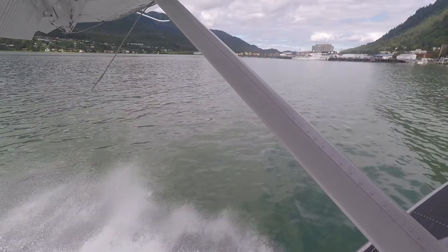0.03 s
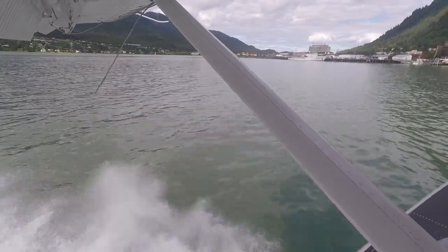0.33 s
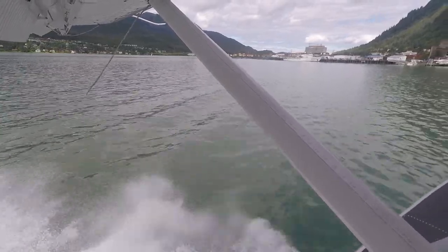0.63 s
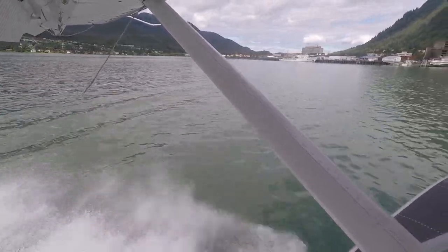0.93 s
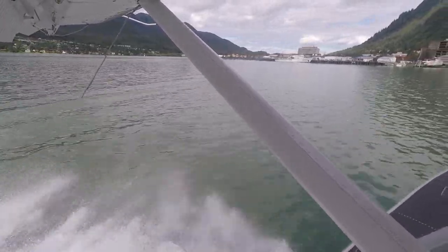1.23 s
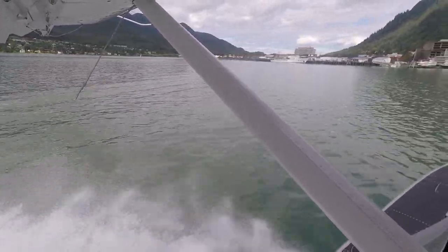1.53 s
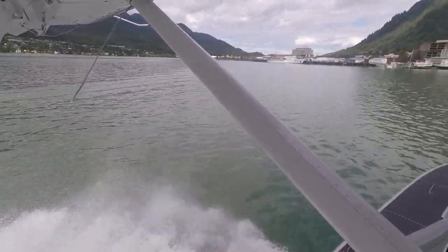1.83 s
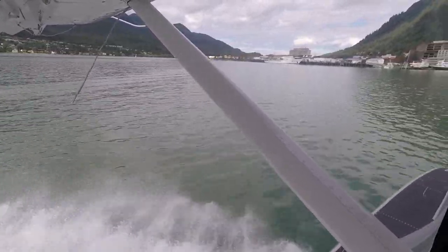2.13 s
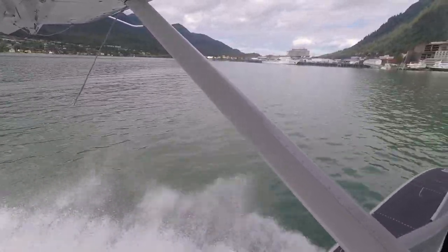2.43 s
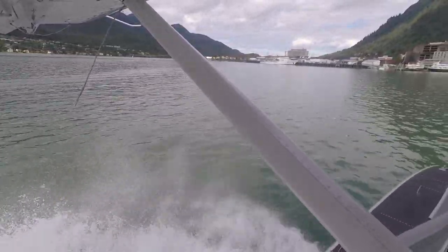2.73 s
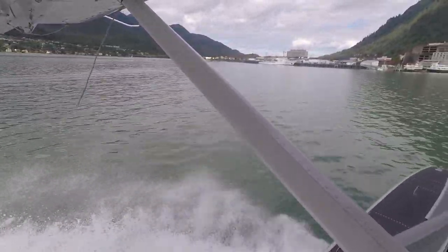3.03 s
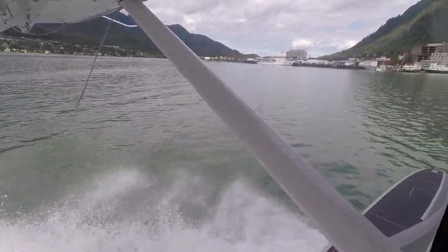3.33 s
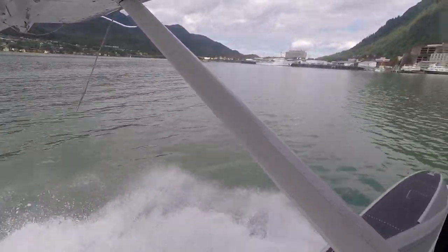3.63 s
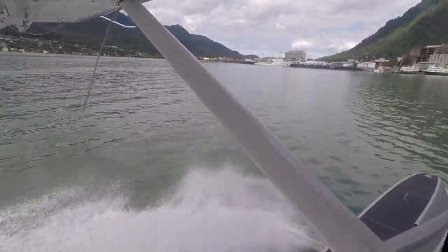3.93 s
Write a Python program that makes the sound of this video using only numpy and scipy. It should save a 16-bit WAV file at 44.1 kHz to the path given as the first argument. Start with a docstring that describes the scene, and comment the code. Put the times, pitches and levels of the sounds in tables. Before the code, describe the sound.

From a cabin seat, a small floatplane's engine gives a deep, steady drone with a faint whine. Waves slap and thump the floats, mostly in the first half, then the airframe roar and spray hiss build slightly.

```python
"""Floatplane cabin, running over water

The piston engine drones and booms in the cabin, its gears whine and an accessory whistles.
The airframe roars and spray rushes along the floats, growing in the second half.
Waves thud against the floats; two slap hard enough to rattle the airframe.
Three brief sheets of spray strike the cabin."""
import sys
import numpy as np
from scipy import signal
from scipy.fft import rfft, irfft
from scipy.io import wavfile
from scipy.ndimage import uniform_filter1d, minimum_filter1d

SR = 44100
rng = np.random.default_rng(int(sys.argv[2]) if len(sys.argv) > 2 else 0)


def master_out(mix):
    """Clip the mix to full scale and print it as 16-bit PCM to the path in sys.argv[1]."""
    frames = np.transpose(np.atleast_2d(mix))
    ceiling = np.clip(frames, -1, 1)
    pcm = np.round(ceiling * 32767).astype(np.int16)
    wavfile.write(sys.argv[1], SR, pcm)


N = 176400
T = np.arange(N) / SR
HZ = np.fft.rfftfreq(N, 1 / SR)


def amp(db):
    """Decibels to gain."""
    return 10 ** (np.asarray(db) / 20)


def unit(x):
    """Scale to rms 1."""
    return x / np.sqrt(np.mean(x ** 2) + 1e-20)


def curve(rows, column=1):
    """Table column, linearly interpolated in time."""
    rows = np.array(rows, float)
    return np.interp(T, rows[:, 0], rows[:, column])


def shape(spectrum):
    """Gain per frequency, falling steeply past the spectrum's ends."""
    hz, db = np.transpose(spectrum)
    ends = 1 / np.sqrt((1 + (hz[0] / (HZ + 1)) ** 24) * (1 + (HZ / hz[-1]) ** 24))
    return ends * amp(np.interp(np.log(HZ + 1), np.log(hz), db))


def colour(x, gain):
    """Filter, then scale to rms 1."""
    return unit(irfft(rfft(x) * gain, N))


def noise(gain):
    """Filtered noise, rms 1."""
    return colour(rng.standard_normal(N), gain)


def drift(rate_hz):
    """Slow random motion, rms 1."""
    return noise(np.exp(-(HZ / rate_hz) ** 2) * (HZ > 0))


def ring(hz, width_hz):
    """Randomly shaken resonance."""
    return noise(1 / (1 + ((HZ - hz) / width_hz * 2) ** 2))


def resonances(modes):
    """Sum of randomly shaken modes."""
    return sum(amp(db) * ring(hz, width_hz) for hz, width_hz, db in modes)


def clicks(per_s, spread_db):
    """Random impacts of uneven size."""
    hits = (rng.random(N) < per_s / SR) * rng.choice([-1, 1], N)
    return hits * amp(spread_db * np.minimum(rng.exponential(1, N), 4))


def rotation(hz, wander, rate_hz):
    """Phase in turns of a wandering pitch."""
    return np.cumsum(hz * (1 + wander * drift(rate_hz))) / SR


def tones(turns, partials, flutter_hz, depth=0.3):
    """Partials of a turning part, each fluttering in level."""
    out = np.zeros(N)
    for multiple, db in partials:
        flutter = 1 + depth * drift(flutter_hz)
        out += amp(db) * unit(flutter * np.cos(2 * np.pi * (multiple * turns + rng.random())))
    return out


def swell(peak_s, length_s):
    """Bell-shaped envelope."""
    return np.exp(-(2 * (T - peak_s) / length_s) ** 2)


# firing harmonics: multiple, level_db
ENGINE_HARMONICS = [(2, -25.5), (3, -42), (4, -39), (6, -54), (8, -46)]
# engine load: time_s, gain_db
ENGINE_LOAD = [(0, -4), (1, -4.5), (2, -8), (2.5, -2), (3.2, -3.5), (4, 6.5)]


def engine_drone(firing_turns):
    """Harmonics of the piston firing, louder under load."""
    return tones(firing_turns, ENGINE_HARMONICS, flutter_hz=6.1) * amp(curve(ENGINE_LOAD))


# main boom: time_s, level_db
BOOM_LEVEL = [(0, -27.5), (1, -24.5), (2, -21), (2.4, -18), (2.8, -23), (3.3, -17.5), (3.7, -26.5),
              (4, -21)]
# cabin resonances: pitch_hz, width_hz, level_db
CABIN_MODES = [(18.9, 3, -32), (48.3, 4, -25.5), (119.4, 22, -30), (159.9, 12, -30), (251.4, 23, -36.5),
               (340, 22, -41.5)]


def cabin_boom():
    """The engine shakes the cabin's resonances; the main one is a near-steady tone."""
    turns = rotation(hz=73.75, wander=0.025, rate_hz=5.9)
    return unit(np.sin(2 * np.pi * turns)) * amp(curve(BOOM_LEVEL)) + resonances(CABIN_MODES)


# engine rumble: freq_hz, relative_db
RUMBLE_SPECTRUM = [(8.8, -40), (15, -12.5), (59, 2), (80, 0), (157, -5), (193, -13), (241, -11), (280, -23),
                   (312, -25), (373, -26.5), (400, -23), (520, -45), (880, -120)]


def engine_rumble(level_db=-17, split_hz=160):
    """Low noise whose upper part grows with load."""
    rumble = amp(level_db) * noise(shape(RUMBLE_SPECTRUM))
    highpass = 1 - 1 / (1 + (HZ / split_hz) ** 10)
    upper = irfft(rfft(rumble) * highpass, N)
    load_db = curve(ENGINE_LOAD)
    upper_gain = amp(0.41 * (load_db - load_db.mean()))
    return rumble + upper * (upper_gain - 1)


# gear fundamental: time_s, pitch_hz
GEAR_PITCH = [(0, 504), (.3, 498), (.6, 488), (1, 478), (1.5, 472.25), (4, 472.25)]
# gear whine: multiple, level_db
GEAR_PARTIALS = [(1, -40.5), (2, -56), (3, -57), (4, -58.5)]
# high partials under load: multiple, level_db
GEAR_SING = [(15, -66), (17, -65)]
# all gear partials: time_s, gain_db
GEAR_GAIN = [(0, -11), (.3, -1), (.6, -3.5), (1, -4), (2.3, -6), (3, -4), (4, 2)]


def gear_whine(sing_start_s=2.3, sing_rise_s=0.5):
    """Gears settle to a steady pitch; high partials join later."""
    turns = rotation(curve(GEAR_PITCH), wander=0.0001, rate_hz=5)
    fade_in = np.clip((T - sing_start_s) / sing_rise_s, 0, 1)
    sing = tones(turns, GEAR_SING, flutter_hz=9) * fade_in
    whine = tones(turns, GEAR_PARTIALS, flutter_hz=12)
    return (whine + sing) * amp(curve(GEAR_GAIN))


# accessory whistle: multiple, level_db
WHISTLE_PARTIALS = [(1, -53.5), (2, -59)]
# whistle rise: time_s, gain_db
WHISTLE_GAIN = [(0, -8), (1, -5), (1.6, -1), (4, 2)]


def accessory_whistle():
    """An engine accessory whistles at a steady pitch, growing louder."""
    turns = rotation(hz=2209.8, wander=0.0005, rate_hz=6)
    return tones(turns, WHISTLE_PARTIALS, flutter_hz=10) * amp(curve(WHISTLE_GAIN))


# airframe noise: freq_hz, relative_db
ROAR_SPECTRUM = [(180, -31), (300, 1), (322, -2.5), (377, -8.5), (468, -6.5), (549, -12), (618, -12),
                 (696, -16), (784, -20), (874, -18), (1120, -15.5), (1220, -18.5), (1340, -22),
                 (1450, -20.5), (1570, -21.5), (2220, -22.5), (3200, -33), (4160, -36), (7040, -120)]
# roar below and above split_hz: time_s, low_gain_db, high_gain_db
ROAR_GAIN = [(0, -28.5, -37.5), (.42, -33, -40.5), (.58, -29.5, -38.5), (.8, -32, -39.5), (1.3, -30.5, -39),
             (1.95, -34, -41), (2.25, -32.5, -40), (2.45, -31.5, -38), (2.75, -28.5, -36),
             (3.05, -28.5, -36.5), (3.25, -28, -36), (3.55, -26.5, -37), (3.85, -28, -34), (4, -25.5, -34)]
# skin resonances at high_gain_db = skin_ref_db: pitch_hz, width_hz, level_db
SKIN_MODES = [(747.4, 11, -51.5), (1119, 69, -50.5), (1214, 40, -50.5), (1476, 38, -54.5), (1681, 45, -54),
              (1894, 82, -55)]


def airframe_roar(firing_pulse, split_hz=783, skin_ref_db=-37):
    """Airframe noise and skin resonances, pulsing slightly with each firing."""
    spectrum = shape(ROAR_SPECTRUM)
    low_share = 1 / (1 + (HZ / split_hz) ** 12)
    low = noise(spectrum * np.sqrt(low_share))
    low *= amp(curve(ROAR_GAIN) + 0.42 * drift(25))
    skin = resonances(SKIN_MODES) / amp(skin_ref_db)
    high = 0.85 * noise(spectrum * np.sqrt(1 - low_share)) + skin
    high *= amp(curve(ROAR_GAIN, column=2) + 0.75 * drift(25))
    return (low + high) * (1 + 0.054 * firing_pulse)


# spray hiss and drops: freq_hz, relative_db
SPRAY_SPECTRUM = [(1650, -11), (2800, -1), (3180, -4.5), (3730, 0), (4270, -2.5), (4950, -4.5), (6740, -8),
                  (8200, -8.5), (9980, -17), (12800, -16), (13800, -18), (15000, -29)]
# spray strength: time_s, gain_db
SPRAY_GAIN = [(0, -44.5), (.42, -48), (.58, -46.3), (.8, -48), (.94, -47), (1.05, -48.5), (1.6, -48),
              (1.95, -50.5), (2.25, -48.5), (2.45, -46.5), (2.7, -46), (2.87, -45), (3.03, -45.5),
              (3.3, -44.5), (3.48, -46.5), (3.9, -43.5), (4, -43.5)]


def float_spray(firing_pulse, drops_gain_db=-9, trim_db=0.5):
    """Spray along the floats: separate drops in a hiss that pulses with the firing."""
    spectrum = shape(SPRAY_SPECTRUM)
    drops = colour(clicks(per_s=600, spread_db=3), spectrum)
    hiss = noise(spectrum) * (1 + 0.058 * firing_pulse)
    gain_db = trim_db + curve(SPRAY_GAIN) + 0.61 * drift(23)
    return (hiss + amp(drops_gain_db) * drops) * amp(gain_db)


# waves on the floats: peak_s, length_s, pitch_hz, level_db
THUDS = [(0.254, 0.18, 99.8, -15.5), (0.63, 0.057, 92, -12.5), (0.734, 0.049, 115.4, -15),
         (0.872, 0.11, 157.7, -19.5), (1.25, 0.32, 116.7, -17.5), (1.535, 0.17, 110.1, -14),
         (1.69, 0.24, 119.4, -16), (2.118, 0.21, 114.2, -17), (3.214, 0.1, 92, -12.5)]


def wave_thuds():
    """Each wave swells one low resonance of the floats."""
    out = np.zeros(N)
    for peak_s, length_s, hz, db in THUDS:
        turns = rotation(hz, wander=0.0591, rate_hz=27.4) + rng.random()
        out += amp(db) * swell(peak_s, length_s) * unit(np.sin(2 * np.pi * turns))
    return out


# hard wave hits: start_s, hold_s, level_db
SLAPS = [(0.206, 0.053, -18.5), (1.115, 0.043, -29)]
# airframe rattle: freq_hz, relative_db
RATTLE_SPECTRUM = [(150, -31), (250, 0), (318, 9), (403, -9), (506, -3.5), (696, -10.5), (997, -16),
                   (1170, -13), (1300, -15.5), (1430, -16), (1550, -18), (2700, -19), (6000, -37),
                   (7800, -73), (13200, -120)]
# panel resonances: pitch_hz, width_hz, relative_db
PANEL_MODES = [(299, 13, -12), (343.4, 9.7, -7.5), (610, 40, -19), (1050, 87, -16.5), (1176, 58, -16)]


def wave_slaps(rise_s=0.0025, sag_db_per_s=42, rattle_decay_s=0.045, panel_decay_s=0.085):
    """Each slap bites, sags as the water drags, then dies; a panel rings on under the rattle."""
    spectrum = shape(RATTLE_SPECTRUM)
    impacts = colour(clicks(per_s=600, spread_db=1.2), spectrum)
    rattle = unit(impacts + 1.4 * noise(spectrum))
    panel = resonances(PANEL_MODES)
    out = np.zeros(N)
    for start_s, hold_s, db in SLAPS:
        age_s = np.maximum(T - start_s, 0)
        release_s = np.maximum(age_s - hold_s, 0)
        force = np.minimum(age_s / rise_s, 1) * amp(db - sag_db_per_s * age_s)
        out += force * rattle * np.exp(-release_s / rattle_decay_s)
        out += force * panel * np.exp(-release_s / panel_decay_s)
    return out


# sheets of spray: peak_s, length_s, level_db
SPITS = [(.56, .06, -56), (2.86, .09, -56), (3.3, 0.046, -53.5)]


def spray_spits():
    """Brief bright sheets of spray strike the cabin."""
    envelope = sum(amp(db) * swell(peak_s, length_s) for peak_s, length_s, db in SPITS)
    return ring(hz=8200, width_hz=1700) * envelope


def scene():
    """All sources at one cabin seat, mono."""
    firing_turns = rotation(hz=77.25, wander=0.003, rate_hz=4.33)
    firing_pulse = np.cos(2 * np.pi * firing_turns)
    engine = engine_drone(firing_turns) + cabin_boom() + engine_rumble()
    whines = gear_whine() + accessory_whistle()
    roar = airframe_roar(firing_pulse)
    water = float_spray(firing_pulse) + wave_thuds() + wave_slaps() + spray_spits()
    return (engine + whines + roar + water)[None]


def record(dry):
    """A limiter holds down the loudest booms; then a low-pass."""
    threshold_db, slope, recover_db_per_s = -3.5, 0.45, 39
    window_samples, cutoff_hz = 300, 15200
    over_db = np.maximum(20 * np.log10(abs(dry[0]) + 1e-9) - threshold_db, 0)
    peak_db = -minimum_filter1d(-over_db, window_samples)
    recovery_db = T * recover_db_per_s
    held_db = np.maximum.accumulate(peak_db + recovery_db) - recovery_db
    limited = dry * amp(-slope * uniform_filter1d(held_db, window_samples))
    lowpass = signal.firwin(511, cutoff_hz, window=("kaiser", 9), fs=SR)
    return signal.oaconvolve(limited, lowpass[None], "same")


dry = scene()
out = record(dry)
master_out(out)
```